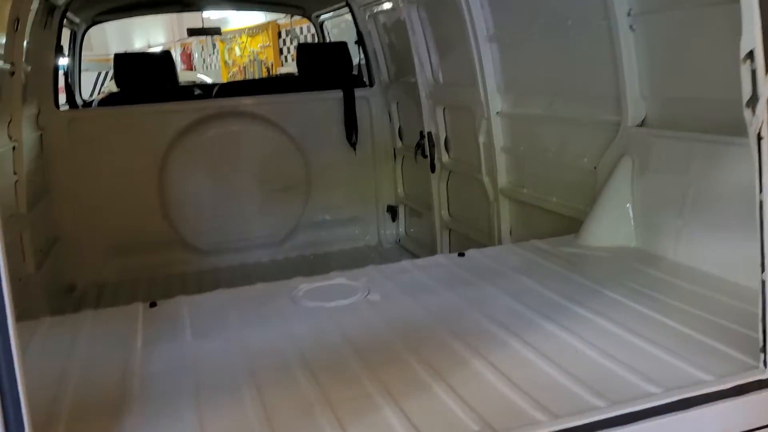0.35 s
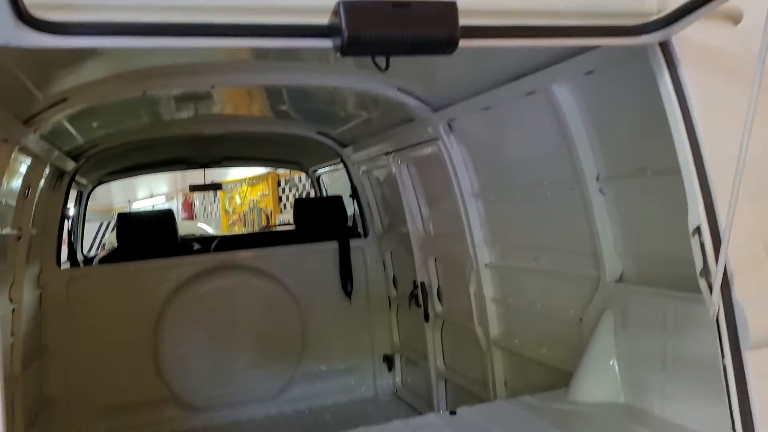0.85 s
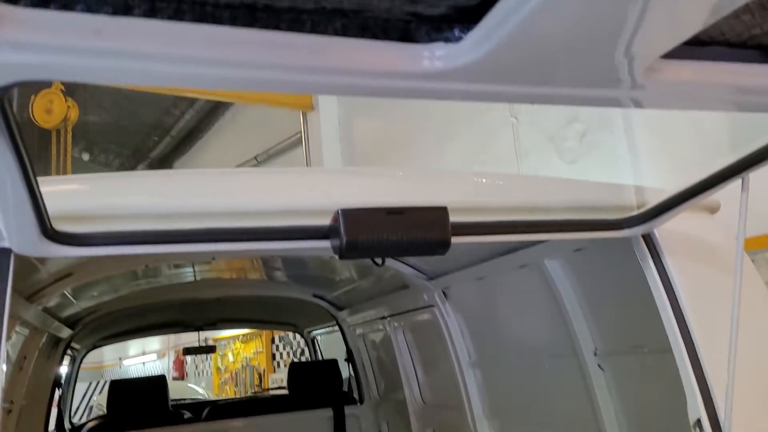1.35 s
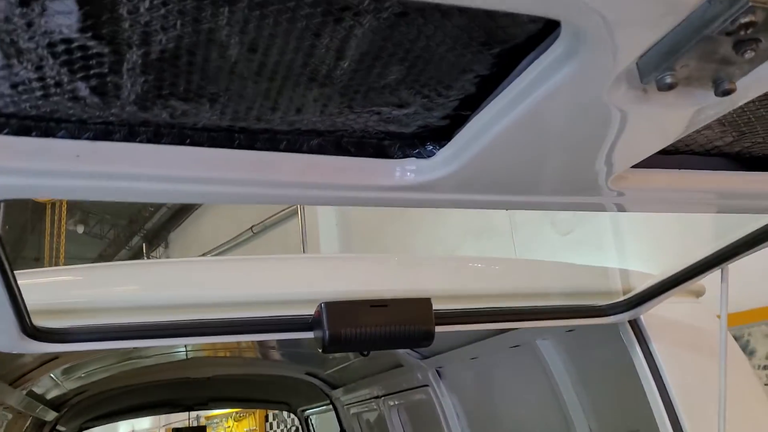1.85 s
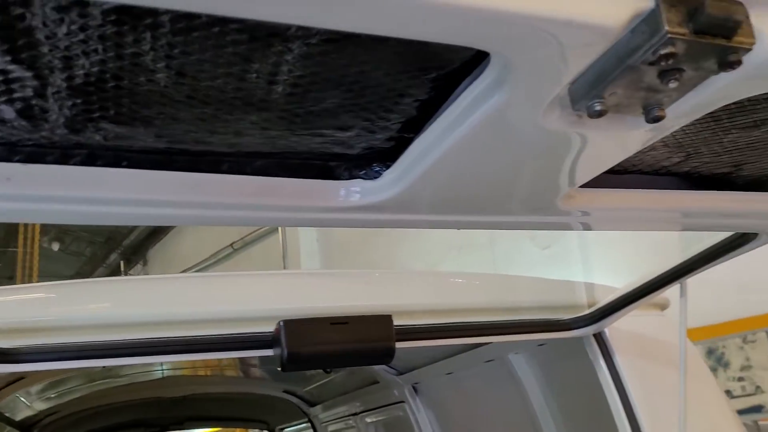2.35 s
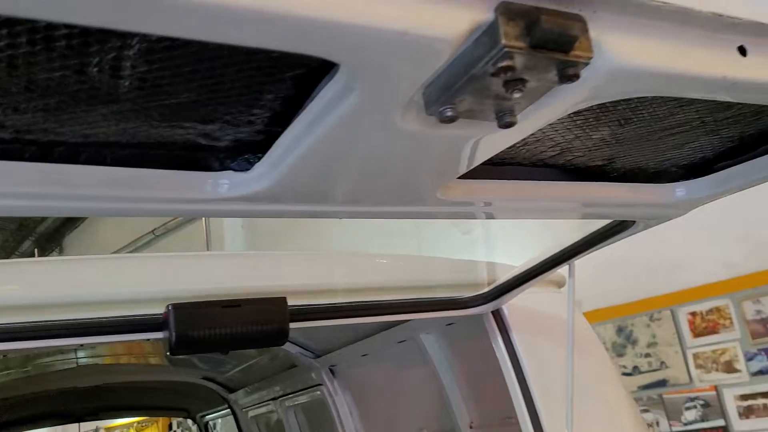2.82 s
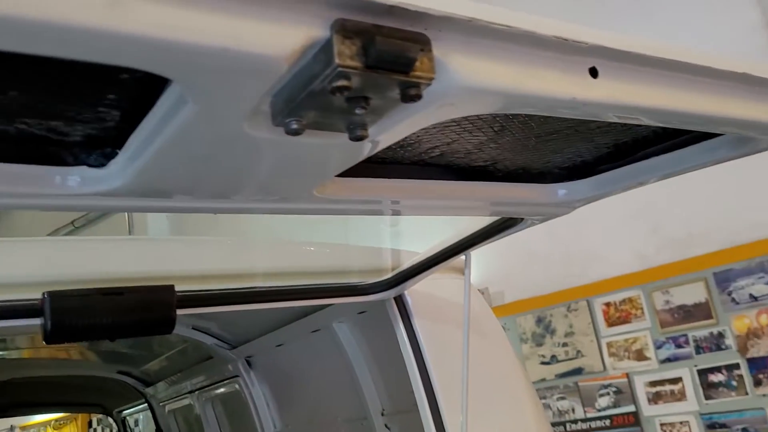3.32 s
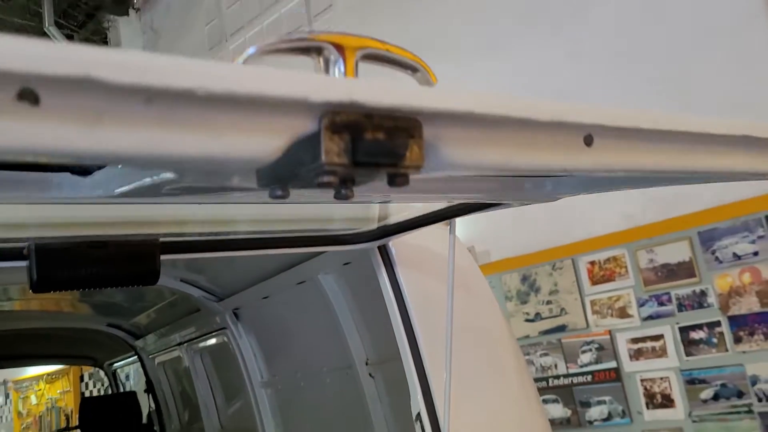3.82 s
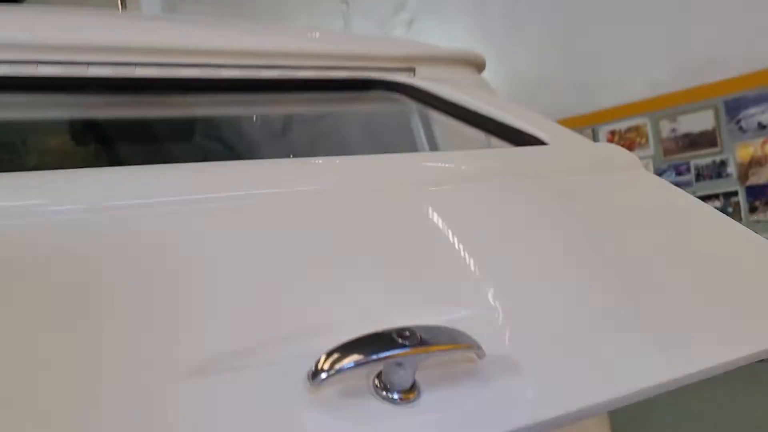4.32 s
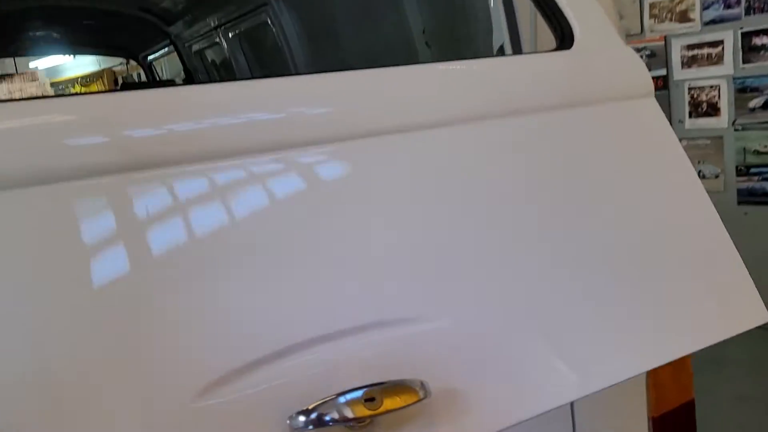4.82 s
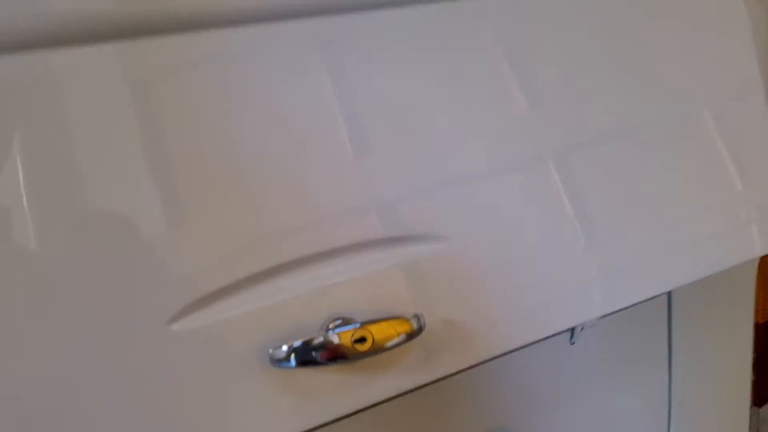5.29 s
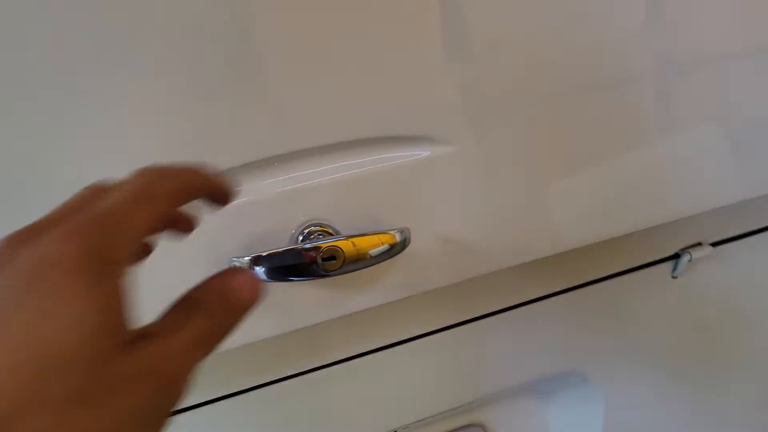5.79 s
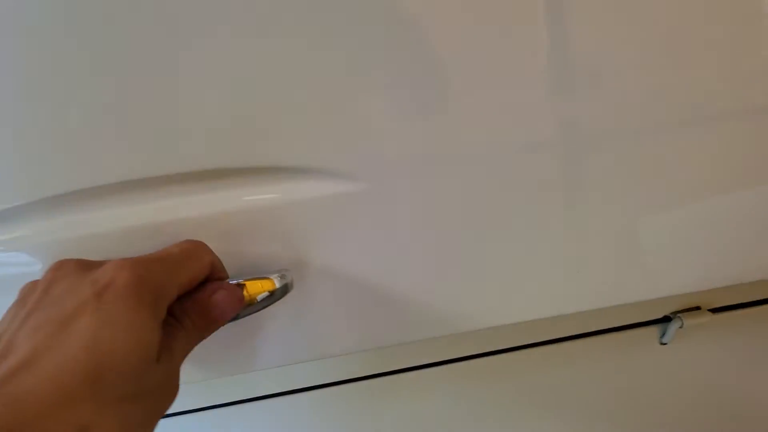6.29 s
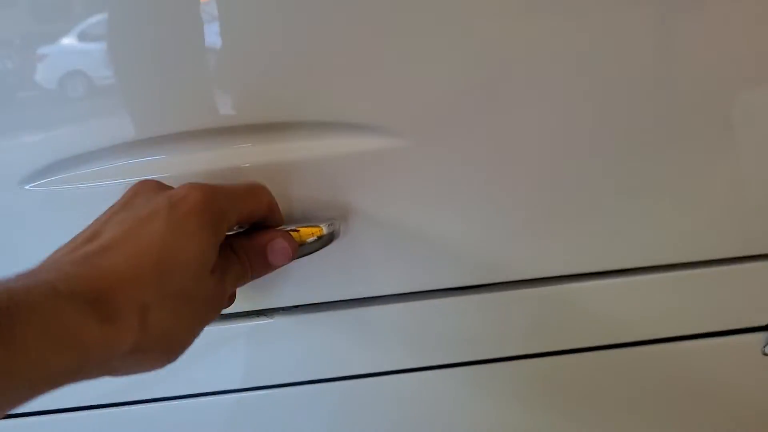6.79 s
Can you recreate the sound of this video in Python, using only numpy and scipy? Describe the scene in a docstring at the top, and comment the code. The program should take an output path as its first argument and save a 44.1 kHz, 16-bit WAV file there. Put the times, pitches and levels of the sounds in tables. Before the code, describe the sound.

A close stereo microphone hears a hard, echoing garage open to a road, with steady airy room tone and low rumble. In the first 0.13 seconds several dull taps knock on sheet metal, then tiny bright ticks near 0.3, a faint tap at 0.5 and ticks at 0.7 and 1.5. Outside, a car approaches, its tyre roar brightest around 2.3 seconds over a low steady engine, receding by 4. At 4.1 a small metallic clack and clatter sounds, with soft dull taps until 4.3. From 4.2 to 5.8 another car pulls away, its low hum rising then levelling. Faint finger rustles brush by, strongest near 5.7; a sharp click-tap lands at 6.1, followed by soft rubbing. At 6.53 the hatch slams, by far the loudest event: two rapid latch snaps, a deep hollow boom, and echo ringing through the end near 7 seconds.

```python
"""Van hatch slammed in a garage

A van's rear hatch is swung down and pushed shut, close by, in a garage that opens on a road.
The latch snaps twice (short bursts of noise) and the hollow body booms (low rings that die away).
Hinges, keys and fingers tick, tap and rustle (small puffs of noise and rings); the garage echoes.
One car rolls past outside at steady speed, another pulls away: shaped noise for the tyres and rumble,
sine waves for the engines."""
import sys
import numpy as np
from scipy import signal
from scipy.io import wavfile
from scipy.ndimage import uniform_filter1d

SR = 44100
rng = np.random.default_rng(int(sys.argv[2]) if len(sys.argv) > 2 else 0)


def invert_db(level):
    """Linear amplitude ratio for a level in decibels (20 dB per decade), elementwise."""
    return 10 ** (np.asarray(level, dtype=float) / 20)


def master_out(mix):
    """Clip the mix to full scale and print it as 16-bit PCM to the path in sys.argv[1]."""
    frames = np.transpose(np.atleast_2d(mix))
    ceiling = np.clip(frames, -1, 1)
    pcm = np.round(ceiling * 32767).astype(np.int16)
    wavfile.write(sys.argv[1], SR, pcm)


N = 304334  # length of the scene [samples]

# latch snaps; levels above and below SPLIT_HZ:
# (time [s], high level [dB], low level [dB], time to die by 60 dB [s])
LATCH_SNAPS = [(6.5254, -15, -5, 0.014), (6.528, -10.5, -9.5, 0.023), (6.5382, -11, -19, 0.031),
               (6.543, -28, -9.5, 0.015), (6.548, -30, -27, 0.02)]
SPLIT_HZ = 5100
# what the struck lid and lock radiate: (frequency [Hz], level per Hz [dB])
CLANG_SPECTRUM = [(90, -10.5), (150, -3.5), (380, -12), (550, -11.5), (1030, -18), (1300, -23), (2100, -16),
                  (3200, -24.5), (4600, -31), (5800, -25.5), (6700, -28.5), (7500, -33), (13000, -30.5),
                  (15700, -43)]
# the lid lands on its seal, then seats: (time [s], swing level [dB])
LID_BLOWS = [(6.5325, -1.8), (6.5451, -6.8)]
# swinging air and frame of the body:
# (frequency [Hz], level [dB], time to die by 60 dB [s], first swing [out +1, in -1])
BODY_SWINGS = [(36, -3.5, .9, -1), (64.9, -2.9, .19, 1), (86.5, -13.4, .26, -1), (107.7, -4.9, .067, 1),
               (135, -22, .6, 1), (192, -13.7, .28, 1)]
# tiny bright ticks of keys and hinge: (time [s], level [dB], ring [Hz], left minus right [dB])
KEY_AND_HINGE_TICKS = [(0.2703, -44, 10100, 1.5), (0.285, -40, 10500, 6), (0.2924, -39, 10500, -4),
                       (0.3024, -43, 10500, 4), (0.6883, -46, 14300, -6), (1.5264, -36, 9400, -3),
                       (4.0774, -48.5, 8980, -3.5), (4.096, -31, 8600, 8), (4.131, -48, 7210, -4),
                       (4.6344, -59, 10400, -12), (4.954, -52, 14300, 1.0), (5.27, -55, 9100, 0.5),
                       (5.4113, -39, 13200, -6), (6.0636, -50, 13000, -7), (6.106, -29.5, 5200, -2),
                       (6.107, -41, 10900, -7)]
# dull taps on sheet metal: (time [s], ring level [dB], ring [Hz], clatter level [dB])
METAL_TAPS = [(.024, -32.5, 862, -37), (0.082, -32, 1000, -29.5), (.095, -36, 1090, -32.5),
              (.103, -28, 856, -35), (0.103, -22, 313, -39), (.123, -23.5, 303, -38.5),
              (.489, -30, 920, -61), (4.0965, -28, 1840, -33.5), (4.102, -33, 985, -38),
              (4.108, -32, 1640, -46), (4.116, -33, 1590, -49), (4.196, -32.5, 259, -50),
              (4.296, -29, 233.5, -54), (6.108, -26, 884, -31.5)]
# loose sheet metal: (frequency [Hz], level per Hz [dB])
CLATTER_SPECTRUM = [(200, -39), (600, 4), (1000, 3), (2000, 0.5), (3500, -9), (6000, -18.5), (9000, -38)]
# strokes of sleeve and fingers: (peak time [s], rise [s], fall [s], peak level [dB])
RUSTLE_STROKES = [(4.53, .06, .05, -75), (4.794, .03, .05, -65), (4.958, .02, .03, -67),
                  (5.65, 0.071, .035, -55), (5.72, .03, .07, -54.5), (6.33, 0.11, 0.18, -57.5)]
# brushing noise: (frequency [Hz], level per Hz [dB])
BRUSH_SPECTRUM = [(4410, -17), (7500, 10), (8380, 8), (9940, 5), (12900, 9), (15700, 1)]
# the passing engine: (time [s], pitch [Hz], fifth multiple [dB], fourth multiple [dB])
CRUISING_ENGINE = [(1.1, 25.63, -44, -68), (1.85, 28.8, -53, -53), (2.05, 29.48, -39.5, -57),
                   (2.44, 29.43, -42, -39), (2.66, 29.52, -37.5, -51), (2.96, 29.64, -42.5, -46),
                   (3.15, 29.4, -35.5, -45.5), (3.5, 29.14, -45, -45), (4.1, 28.1, -56.5, -61)]
# the engine pulling away; its second multiple sounds under load until lift-off:
# (time [s], pitch [Hz], level [dB], second multiple [dB])
PULLING_ENGINE = [(4.2, 40.4, -46, -58), (4.66, 56.84, -38.5, -45), (4.73, 58.35, -39, -31),
                  (4.86, 65.1, -44, -39), (5.094, 72.6, -34, -33), (5.205, 72, -34.5, -31.5),
                  (5.24, 72.6, -34.5, -52), (5.4, 74.1, -39, -50), (5.5, 76.15, -34, -49.5),
                  (5.63, 72, -41, -41), (5.8, 72.1, -46, -47)]
# wavering low drones from outside: (frequency [Hz], level [dB])
OUTSIDE_DRONES = [(40, -55.5), (56, -46.5), (103, -54.5), (163, -55), (296, -56)]
# traffic through the open door: (time [s], tyre roar [dB], rumble [dB])
ROAD_LEVELS = [(0, -54, -41), (0.6, -51, -41.5), (1.2, -46.5, -39), (1.75, -42, -38), (2.3, -38, -38.5),
               (2.8, -41.5, -36.5), (3.3, -42, -42), (3.6, -45.5, -43.5), (4.0, -53.5, -43.5),
               (4.76, -47, -37), (5.1, -50, -39), (5.57, -46.5, -38), (6.05, -55.5, -38), (6.37, -53, -38),
               (6.9, -53, -40.5)]
# tyre roar: (frequency [Hz], level per Hz [dB])
TYRE_SPECTRUM = [(240, -22), (400, -2.5), (471, -7), (508, -12), (597, -9), (739, -15.5), (881, -11),
                 (1180, -15.5), (1320, -10), (1510, -11.5), (1990, -8.5), (3200, -18), (8000, -26.5),
                 (10400, -43), (17600, -120)]
# the thin top of the tyre noise: (frequency [Hz], level per Hz [dB])
SPRAY_SPECTRUM = [(3820, -12), (6500, -15), (7080, -4), (9440, 2), (10700, 0.5), (13200, 0), (15700, -8)]
# traffic rumble: (frequency [Hz], level per Hz [dB])
RUMBLE_SPECTRUM = [(13, -27), (22, -2), (54, -3), (144, -2.5), (193, -6.5), (258, -2), (502, -14),
                   (563, -14), (623, -23.5), (700, -18), (910, -23.5), (1540, -120)]
# steady room tone: (frequency [Hz], level per Hz [dB])
ROOM_SPECTRUM = [(240, -36), (400, -3.5), (504, 1.5), (527, -8.5), (664, -2.5), (875, -3.5), (945, -4),
                 (1170, -4.5), (1520, -7), (1950, -4.5), (3180, -12), (4670, -15.5), (15700, -34)]
# colour of the garage echo: (frequency [Hz], level [dB])
WALL_COLOUR = [(100, 6.5), (400, 1), (1200, -2), (2500, 0), (5000, 1.5), (8500, 2), (13000, -1.5)]
# how long the garage rings: (frequency [Hz], time to die by 60 dB [s])
GARAGE_DECAY = [(120, 1.7), (320, 0.62), (840, 1.27), (2210, 1.42), (5820, 0.92), (10000, 0.59)]
# how alike left and right are: (frequency [Hz], likeness [-1 to 1])
EAR_LIKENESS = [(60, 0.87), (130, 0.87), (290, 0.93), (640, 0.49), (1410, -0.087), (3100, 0.1),
                (6820, -0.081), (15000, -0.032)]
# balance of the noises: (frequency [Hz], left minus right [dB])
EAR_BALANCE = [(60, -1.5), (180, 1), (550, 1), (1650, -4), (4970, 4), (15000, -4.5)]
# colour of the microphone ports: (frequency [Hz], level [dB])
MIC_COLOUR = [(1400, 4), (2100, 2.5), (2650, 1), (3100, -1.5), (4200, -0.5), (5800, 0.5), (6400, -3),
              (7400, -2), (9300, 1), (13000, 2)]


def latch():
    """Each snap lets the many close modes of lock and lid crackle for a few milliseconds."""
    clang = hiss(CLANG_SPECTRUM, patchy_db=-1.5)
    high = evened(band(clang, SPLIT_HZ, 21000, order=4))
    low = evened(band(clang, 820, SPLIT_HZ))
    out = np.zeros((2, N))
    for s, high_db, low_db, t60 in LATCH_SNAPS:
        snap = invert_db(high_db) * high + invert_db(low_db) * low
        out += snap * dying(s, t60, rise=0.00033)
    return out


def boom():
    """Each blow swings the air and frame of the body, reaching the right port late, and drums the panels."""
    out = np.zeros((2, N))
    swing = sum(way * invert_db(db) * ring(hz, t60) for hz, db, t60, way in BODY_SWINGS)
    drum = evened(band(hiss(CLANG_SPECTRUM, patchy_db=4.0), 230, 1950))
    for s, db in LID_BLOWS:
        add(out[:1], s - 0.0004, invert_db(db) * swing)
        add(out[1:], s + 0.0004, invert_db(db) * swing)
        out += invert_db(db - 12.5) * drum * dying(s - 0.002, 0.12, rise=0.00048)
    return out


def ticks():
    """Each tick is two narrow puffs of bright noise and a wide crack, gone in milliseconds."""
    out = np.zeros((2, N))
    for s, db, hz, pan_db in KEY_AND_HINGE_TICKS:
        main_ring = burst(0.88 * hz, 1.07 * hz, 0.0078)
        bright_ring = invert_db(-12) * burst(11400, 14500, 0.0081)
        crack = invert_db(-8) * burst(3000, 16000, 0.012)
        add(out, s, invert_db(db) * (main_ring + bright_ring + crack), pan_db)
    return out


def taps():
    """A tap is a low ring plus metal clatter; returns the direct sound and what feeds the echo."""
    swings_to_die, echo_db = 35.2, 17.5  # swings until 60 dB down; echo feed against the clatter
    out, feed = np.zeros((2, 2, N))
    clatter = hiss(CLATTER_SPECTRUM, patchy_db=-2.5)
    pulse = colour(CLATTER_SPECTRUM)
    pulse = pulse / np.linalg.norm(pulse)
    for s, db, hz, clatter_db in METAL_TAPS:
        t60 = swings_to_die / hz
        add(out, s, invert_db(db) * ring(hz, t60, rise=0.87 / hz))
        # neighbouring modes blur the pitch
        add(out, s, invert_db(db - 18.5) * burst(0.65 * hz, 0.91 * hz, t60))
        out += invert_db(clatter_db) * clatter * dying(s, 2.08 * t60, rise=0.0012)
        add(feed, s, invert_db(clatter_db + echo_db) * pulse)
    return out, feed


def rustle():
    """Fine treble friction, grainy, in strokes that swell and sink."""
    stroke_db = 9  # how far a stroke has sunk one rise before and one fall after its peak
    t = np.arange(N) / SR
    level = np.zeros(N)
    for s, rise, fall, db in RUSTLE_STROKES:
        away = np.maximum((s - t) / rise, (t - s) / fall)
        level += invert_db(db - stroke_db * np.minimum(away, 10) ** 1.5)
    grain = invert_db(1.6 * evened(uniform_filter1d(rng.standard_normal(N), size=300)))
    return level * grain * hiss(BRUSH_SPECTRUM, patchy_db=1, same=[(5000, 0.38), (15000, 0.29)])


def cruising_engine():
    """The passing engine sounds at whole multiples of one pitch; the second multiple swells once."""
    t = np.arange(N) / SR
    hz, fifth_db, fourth_db, fade = curve(CRUISING_ENGINE)
    turn = 2 * np.pi * np.cumsum(hz) / SR  # phase [radians]
    orders = [(4, fourth_db), (5, fifth_db), (7, fourth_db - 7.5), (10, fifth_db - 14.5)]
    out = np.zeros(N)
    for multiple, db in orders:
        tone = np.sin(multiple * turn + 2 * np.pi * rng.random())
        out += invert_db(db) * waver(1.5, hz=2.3) * tone
    swell = np.exp(-((t - 2.94) / 0.14) ** 2)  # centre and width [s]
    throb = invert_db(-39) * swell * waver(4.0, hz=9.9) * np.sin(2 * turn)
    return fade * (out + throb)


def pulling_engine():
    """The car pulling away sounds at one changing pitch and at its second multiple."""
    hz, level_db, load_db, fade = curve(PULLING_ENGINE)
    turn = 2 * np.pi * np.cumsum(hz) / SR
    first = invert_db(level_db) * np.sin(turn)
    second = invert_db(load_db) * waver(0.89, hz=13.0) * np.sin(2 * turn)
    return fade * (first + second)


def drones():
    """Low tones from outside whose pitch and level both wander."""
    out = np.zeros(N)
    for hz, db in OUTSIDE_DRONES:
        turn = 2 * np.pi * np.cumsum(hz * waver(0.25, hz=1.528)) / SR
        out += invert_db(db) * waver(3.3, hz=2.05) * np.sin(turn)
    return out


def engines():
    """Low firing orders of both cars and the drones, alike in both ears."""
    return np.sqrt(2) * (cruising_engine() + pulling_engine() + drones())  # makes the levels rms


def tyres(roar_db):
    """Tyre roar that brightens as it gets louder, with a thin top that follows it a little ahead."""
    top_at_40_db, top_follows, top_leads_s = -57.5, 1.17, 0.2  # top at a roar of -40 dB; dB per dB; lead
    bright_follows = 0.18  # extra dB of the upper roar per dB of roar: nearer is brighter
    t = np.arange(N) / SR
    top_db = top_at_40_db + top_follows * (np.interp(t + top_leads_s, t, roar_db) + 40)
    roar = hiss(TYRE_SPECTRUM, patchy_db=0.7)
    upper = band(roar, 2150, 3900, order=1)
    roar = roar + (invert_db(bright_follows * (roar_db + 49)) - 1) * upper
    return invert_db(roar_db) * roar + invert_db(top_db) * hiss(SPRAY_SPECTRUM, patchy_db=0.5)


def rumble(rumble_db):
    """Low traffic noise whose deepest part wavers and slowly gains on the rest."""
    t = np.arange(N) / SR
    noise = band(hiss(RUMBLE_SPECTRUM, patchy_db=1.0), 34.4, 3700, order=3)
    deep = band(noise, 20, 138)
    swell = invert_db(-1.5 + 1.21 * t) * waver(3.0, hz=1.86)  # rises 1.21 dB per second
    return invert_db(rumble_db) * (noise - deep + swell * deep)


def road():
    """Tyre noise and rumble follow the passing traffic, over a steady room tone."""
    roar_db, rumble_db, _ = curve(ROAD_LEVELS)
    room = invert_db(-48.5) * hiss(ROOM_SPECTRUM, patchy_db=2.5)
    return room + tyres(roar_db) + rumble(rumble_db)


def garage(x):
    """The echo: sparse taps of random sign, each band dying at its own speed."""
    echoes = np.zeros((2, SR))
    # one tap somewhere in every 20 samples
    at = np.arange(300, SR - 20, 20) + rng.integers(0, 20, (2, (SR - 301) // 20))
    np.put_along_axis(echoes, at, rng.choice([-1., 1.], at.shape), 1)
    hz, t, z = signal.stft(echoes, SR, nperseg=256)
    like = np.clip(read(EAR_LIKENESS, hz), 0, 1)[:, None]
    z[1] = like * z[0] + np.sqrt(1 - like ** 2) * z[1]  # long waves reach both ports alike
    level_db = read(WALL_COLOUR, hz)[:, None] - 60 * t / read(GARAGE_DECAY, hz)[:, None]
    tail = signal.istft(z * invert_db(level_db), SR, nperseg=256)[1]
    tail = tail / np.linalg.norm(tail[0])
    return signal.fftconvolve(x[:1], tail, axes=1)[:, :N]


def hiss(spectrum, patchy_db, same=EAR_LIKENESS):
    """Two-channel noise of rms 1 with the given spectrum and drifting louder and softer patches."""
    frames, hz = N // 512 + 5, np.fft.rfftfreq(2048, 1 / SR)
    a, b, c, d, patches = rng.standard_normal((frames, 1025, 5)).T
    patches = uniform_filter1d(patches, size=20, axis=0)
    patches = evened(uniform_filter1d(patches, size=8, axis=1))
    like = np.clip(read(same, hz), -1, 1)[:, None]
    left = a + 1j * b
    right = like * left + np.sqrt(1 - like ** 2) * (c + 1j * d)
    lean = read(EAR_BALANCE, hz)[:, None] / 2
    level_db = read(spectrum, hz)[:, None] + patchy_db * patches + np.array([lean, -lean])
    z = np.array([left, right]) * invert_db(level_db)
    return evened(signal.istft(z, nperseg=2048, noverlap=1536)[1][:, :N])


def waver(depth_db, hz):
    """A randomly wandering factor around 1, such as reflections along the road give a sound."""
    slow_pass = signal.butter(2, hz, fs=SR / 100, output="sos")
    x = evened(signal.sosfilt(slow_pass, rng.standard_normal(N // 100 + 2)))
    return invert_db(depth_db * np.interp(np.arange(N) / 100, np.arange(len(x)), x))


def ring(hz, t60, rise=1e-5):
    """A struck body's sine wave, losing 60 dB in t60 seconds."""
    t = np.arange(SR) / SR
    return np.sin(2 * np.pi * hz * t) * invert_db(-60 * t / t60) * (1 - np.exp(-t / rise))


def burst(lo_hz, hi_hz, t60):
    """A puff of band noise with a sharp start, different in each ear, peak 1."""
    t = np.arange(SR // 4) / SR
    x = band(rng.standard_normal((2, len(t))) * invert_db(-60 * t / t60), lo_hz, hi_hz)
    return x / abs(x).max(1, keepdims=True)


def dying(s, t60, rise):
    """The loudness shape of a hit at time s: a quick rise, then a steady fall in dB."""
    t = np.maximum(np.arange(N) / SR - s, 0)
    return (1 - np.exp(-t / rise)) * invert_db(-60 * np.minimum(t / t60, 3))


def band(x, lo_hz, hi_hz, order=2):
    """Keeps only the sound between two frequencies."""
    edges = [lo_hz, min(hi_hz, 20000)]
    return signal.sosfilt(signal.butter(order, edges, "bandpass", fs=SR, output="sos"), x)


def colour(points):
    """A short pulse with the given spectrum."""
    hz = np.linspace(0, SR / 2, 200)
    return signal.firwin2(511, hz, invert_db(read(points, hz)), fs=SR)


def curve(rows):
    """Joins the rows at every sample; returns columns and a fade over the table's span."""
    s, *columns = np.transpose(rows)
    t = np.arange(N) / SR
    fade = np.clip(np.minimum(t - s[0], s[-1] - t) / 0.04, 0, 1)
    return [np.interp(t, s, c) for c in columns] + [fade]


def read(points, hz):
    """Reads a spectrum on a log-frequency axis."""
    f, value = np.transpose(points)
    return np.interp(np.log(hz + 1), np.log(f + 1), value)


def evened(x):
    """Scales to rms 1."""
    return x / np.sqrt(np.mean(x ** 2) + 1e-20)


def add(mix, s, sound, pan_db=0.):
    """Mixes a sound in at time s, leaning to the left by pan_db."""
    part = mix[:, round(s * SR):][:, :sound.shape[-1]]
    sides = invert_db(np.array([[pan_db / 2], [-pan_db / 2]]))[:len(mix)]
    part += sound[..., :part.shape[1]] * sides


def scene():
    """Everything at the microphone."""
    tapping, feed = taps()
    pulse = colour(CLANG_SPECTRUM)
    pulse = pulse / np.linalg.norm(pulse)
    for s, db in LID_BLOWS:
        add(feed, s - 0.006, invert_db(db + 11) * pulse)  # the whole slam rings on in the garage
    hatch = latch() + boom()
    handling = ticks() + tapping + rustle()
    return hatch + handling + engines() + road() + garage(feed)


def band_limit(x):
    """A steep low-pass at the top of the band."""
    return signal.sosfilt(signal.butter(12, 16950, fs=SR, output="sos"), x)


def record(dry):
    """Low cut, port colour, a soft ceiling that catches the slam, then the band limit."""
    low_cut = signal.butter(3, 30, "highpass", fs=SR, output="sos")
    cut = signal.sosfilt(low_cut, dry)
    heard = signal.oaconvolve(cut, colour(MIC_COLOUR)[None], "same")
    limited = 1.376 * np.tanh(heard / 1.642)
    edge = signal.firwin(301, 15850, window=("kaiser", 8), fs=SR)[None]  # treble ends near 15850 Hz
    finished = signal.oaconvolve(limited, edge, "same")
    return band_limit(finished)


dry = scene()
out = record(dry)
master_out(out)
```